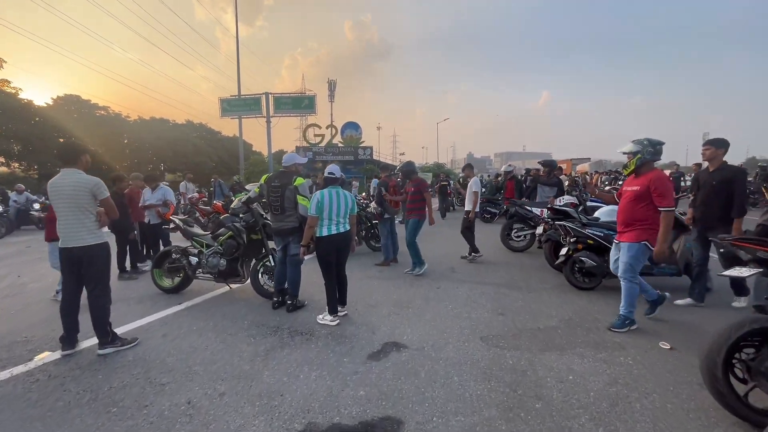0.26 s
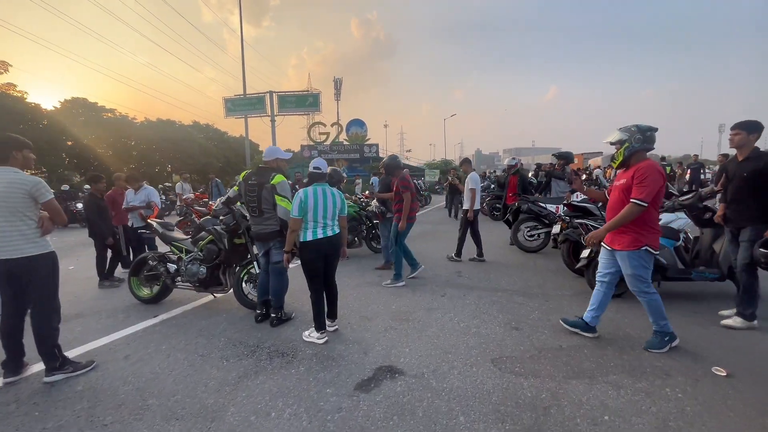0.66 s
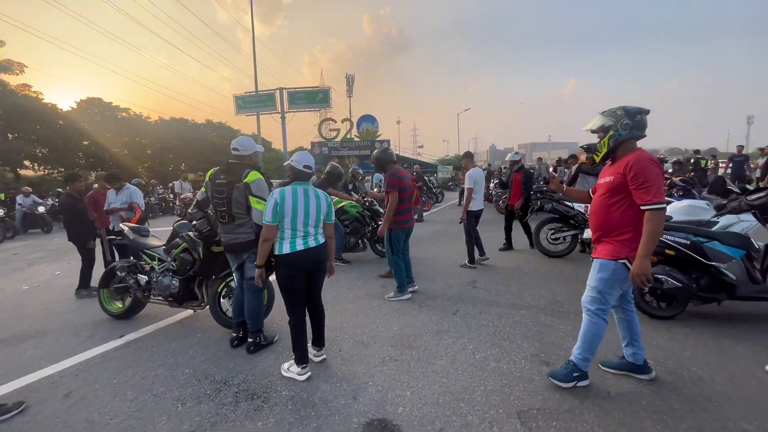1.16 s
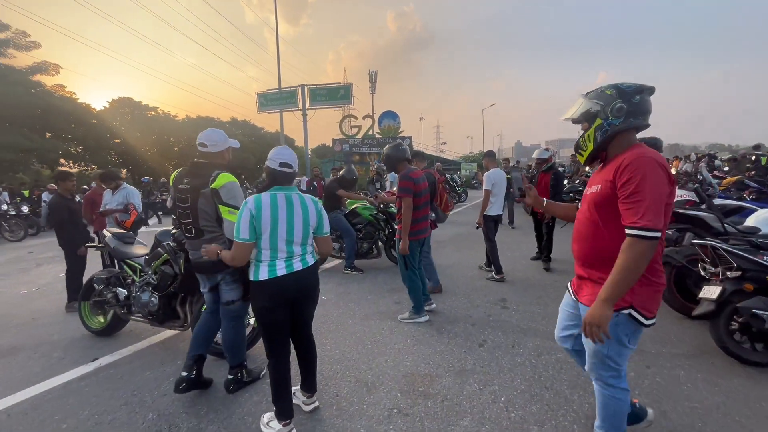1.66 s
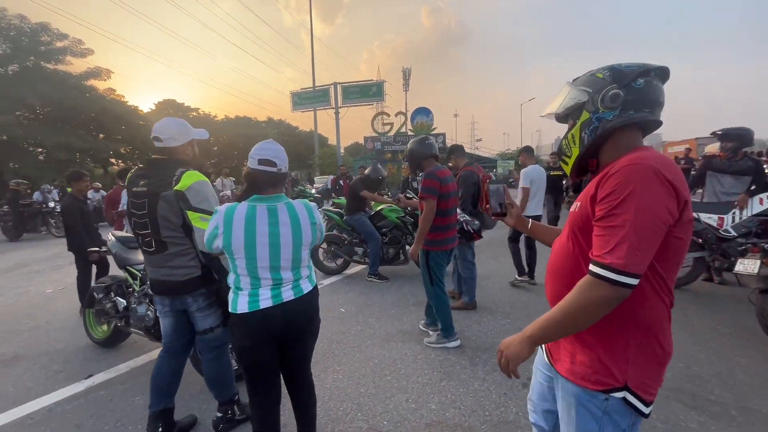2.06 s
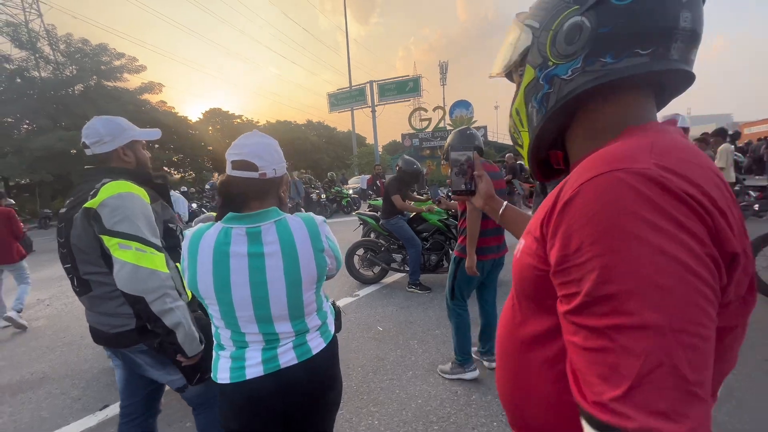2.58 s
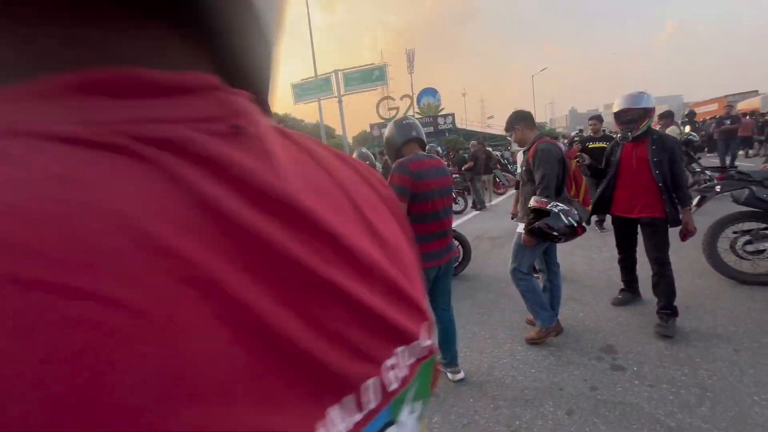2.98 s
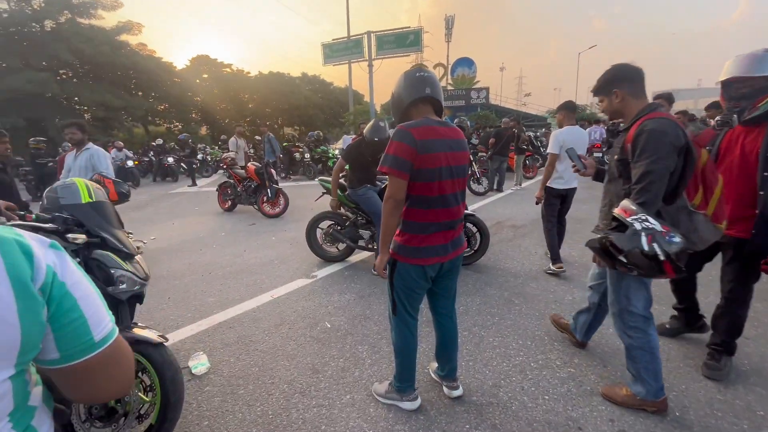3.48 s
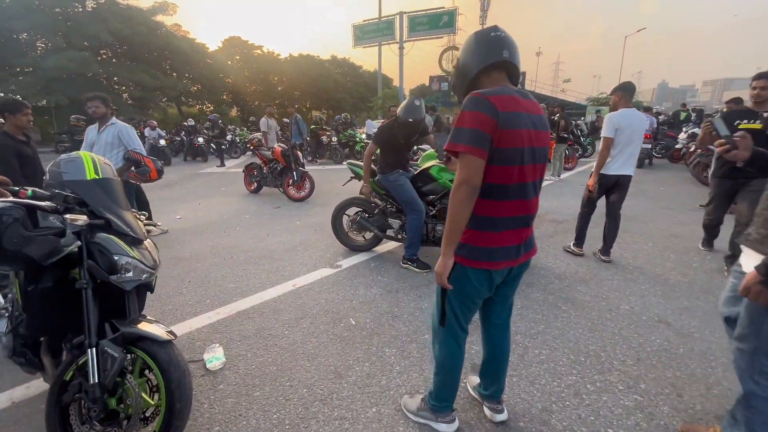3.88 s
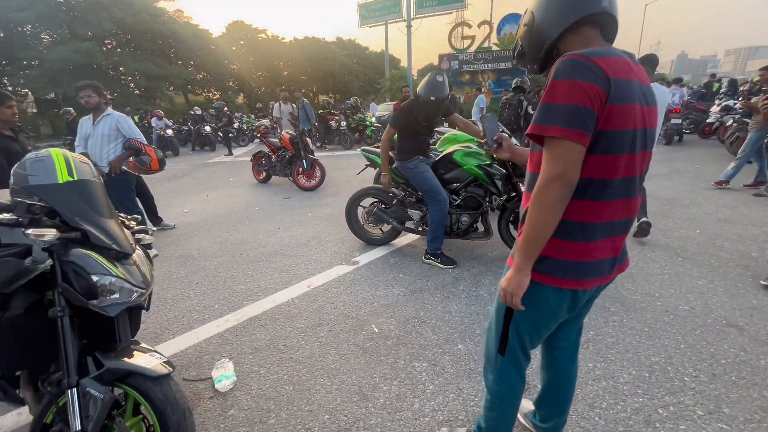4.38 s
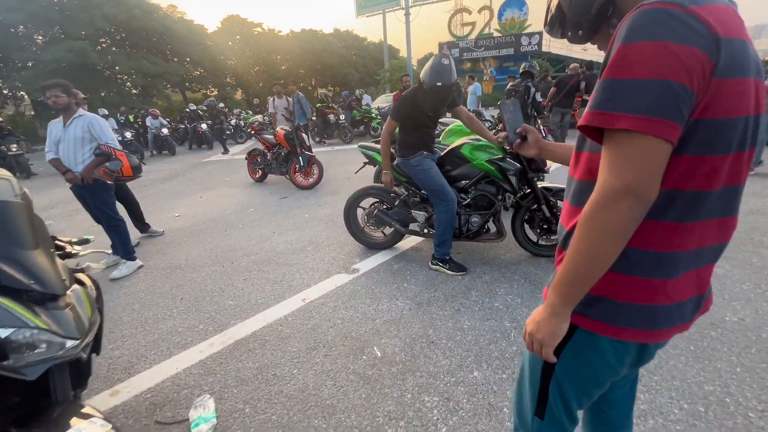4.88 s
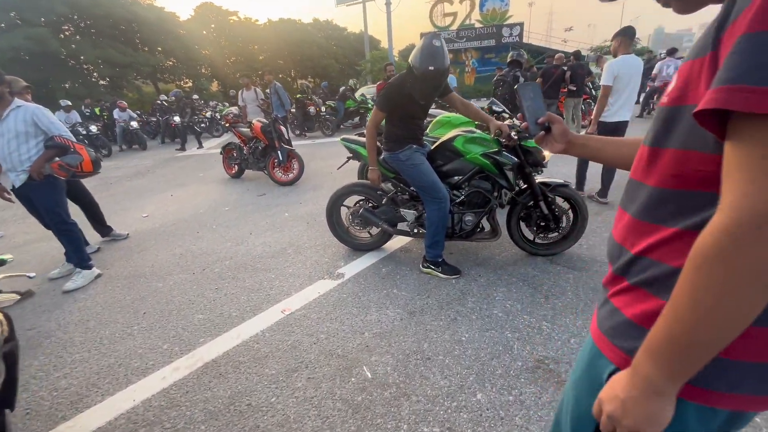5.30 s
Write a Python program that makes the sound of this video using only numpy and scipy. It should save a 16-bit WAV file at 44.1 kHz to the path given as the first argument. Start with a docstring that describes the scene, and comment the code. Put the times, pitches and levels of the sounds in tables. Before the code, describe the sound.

On an open street a sporty motorcycle engine falls from high revs, then is blipped four times, rasping, crackling and sinking back.

```python
"""A four-cylinder motorcycle engine at a standstill coasts down, then is blipped four times, on an open street.
Each blip climbs to the rev limiter, where the firings turn uneven and bark, then the revs coast down again.
One firing phase drives the low harmonics, the pressure fronts that ring the pipe into a rasp, and the hiss;
decaying sines that glide down pop around the limiter. Filtered noise lies throughout as a low background."""
import sys
import numpy as np
from scipy import signal
from scipy.fft import rfft, irfft, next_fast_len
from scipy.io import wavfile
from scipy.ndimage import uniform_filter1d

SR = 44100
rng = np.random.default_rng(int(sys.argv[2]) if len(sys.argv) > 2 else 0)


def wav_out(sig):
    """Save sig, one row per channel (or a flat mono array), as 16-bit PCM at SR to the path in sys.argv[1]."""
    wavfile.write(sys.argv[1], SR, np.round(np.clip(np.atleast_2d(sig).T, -1, 1) * 32767).astype(np.int16))


N = 244314
PADDED = next_fast_len(N + 4096)   # FFT length with room for filter tails

LIMIT_HZ = 366   # firings per second held by the rev limiter
COAST_HZ_PER_S, FUELLED_HZ_PER_S = 260, 200   # revs fall fast, then slower once the fuel returns
FUEL_BACK_HZ = 190   # firing rate at which the fuel returns

# spells on the rev limiter: (from [s], to [s])
LIMITER = [(0.933, 1.126), (2.135, 2.5), (3.854, 4.01), (4.905, 5.08)]


def engine():
    """Source superposition: tones, rasp and hiss share one firing phase, so they move together."""
    hz, db1, db2, db3, db4, rasp_db, hiss_db, pan_db = exhaust()
    bark_hiss, bark_rasp, spark = barks()
    t = np.arange(N) / SR
    cutting = uniform_filter1d(sum(1. * (t > a) * (t < b) for a, b in LIMITER), size=200)
    phase, strength, edge = firings(hz, cutting)
    lit = edge * (1 - 0.62 * cutting * (1 - spark))   # overtones sink between barks
    stumble = .8 * cutting * drift(60)   # radians the beat slips on the limiter
    low = low_tones(hz, phase, stumble, strength, lit, db1, db2, pan_db)
    upper = upper_tones(phase + stumble, lit, db3, db4)
    rasp = rasps(phase, stumble, edge, rasp_db, bark_rasp)
    hiss = hisses(phase, hiss_db, bark_hiss)
    common, *own = np.add(rasp, hiss)
    return low + ports(common + upper, np.array(own) + upper)


def firings(hz, cutting):
    """Phase is the integral of frequency; each firing draws its strength, most unevenly on the limiter."""
    # the four cylinders fire unequally: (level [dB])
    cylinder_db = [.3, -.5, .5, -.3]
    turns = np.cumsum(hz * (1 + .002 * drift(30))) / SR
    firing = np.floor(turns + .5).astype(int)
    chance = rng.standard_normal((3000, 2))[firing]
    cylinder = amp(np.array(cylinder_db)[firing % 4])
    strength = cylinder * (1 + (.02 + .55 * cutting) * chance[:, 0])
    edge = cylinder ** 4 * (1 + (.2 + .55 * cutting) * chance[:, 1])
    return 2 * np.pi * turns, uniform_filter1d(strength, size=200), uniform_filter1d(edge, size=40)


def low_tones(hz, phase, stumble, strength, lit, db1, db2, pan_db):
    """Fourier synthesis of the firing tone, its 2nd harmonic and the crank's fractional multiples."""
    # the uneven cylinders hum at fractions of the firing rate: (multiple of firing rate, level [dB])
    crank = [(.5, -49.5), (.75, -48.5), (1.251, -44), (1.5, -60), (1.749, -62.5)]
    heard = phase - 2 * np.pi * hz * np.array([[.0003], [0]])   # the left port hears it 0.3 ms later
    boom = strength * amp(db1) * np.cos(heard + stumble)
    # the silencer chokes the boom above its chamber resonance
    boom = signal.sosfilt(signal.cheby2(6, 30, 520, fs=SR, output="sos"), boom)
    second = lit * amp(db2 + 3.5 * drift(20)) * np.cos(2 * (heard + stumble) + 1)
    hum = sum(amp(db + 6.4 * drift(11)) * np.cos(multiple * heard) for multiple, db in crank)
    return (boom + second + hum) * np.sqrt(2) * amp([pan_db / 2, -pan_db / 2])


def upper_tones(beat, lit, db3, db4):
    """Comb filtering: reflections break up the gliding 3rd and 4th harmonics at unchanged spread."""
    third = amp(db3 + 3 * drift(16)) * np.cos(3 * beat + 2.2)
    fourth = amp(db4 + 3 * drift(16)) * np.cos(4 * beat + 1.1)
    upper = lit * 2 * (third + fourth)
    return np.std(upper) * echoes(upper, 1)


def rasps(phase, stumble, edge, rasp_db, bark_rasp):
    """Source-filter principle: sharp pressure fronts and torn flow excite the pipe resonances."""
    # overtones 5 to 24 slope off, each wavering in level and phase
    fronts = edge * sum(amp(4 * drift(9) - .7 * (k - 8)) * np.cos(k * (phase + stumble) + .8 * drift(12))
                        for k in range(5, 25))
    # torn gas flow rides each front
    gusts = 1.3 * edge * (1 + .5 * np.cos(phase)) * rng.standard_normal(N)
    rung = pipe(fronts + gusts)
    # a bark also rings the lower overtones
    barked = rung + pipe(0.7 * edge * sum(np.cos(k * phase) for k in (2, 3, 4)))
    # one common part and one for each port, told apart by their echo paths
    return [amp(rasp_db) * echoes(rung, stretch) + bark_rasp * echoes(barked, stretch)
            for stretch in (1, 1.23, .81)]


def hisses(phase, hiss_db, bark_hiss):
    """Amplitude-modulated turbulence: broadband flow noise swells a little with each firing."""
    # noise colour before scaling to unit rms: (frequency [Hz], relative level [dB])
    hiss_spectrum = [(450, -58), (700, -10), (1100, -10), (1600, -13), (2430, -13.5), (3850, -12),
                     (5000, -16.5), (5750, -21), (6400, -19.5), (7100, -25.5), (9200, -21.5),
                     (11500, -27.5), (13700, -29.5), (15600, -44)]
    puff = 1 + 0.15 * np.cos(phase - .6)
    return [(amp(hiss_db + 2 * drift(30)) + bark_hiss) * colour(puff * rng.standard_normal(N), hiss_spectrum)
            for _ in range(3)]


def exhaust():
    """Radiation by operating point: harmonic, rasp and hiss levels follow speed, drive and blip."""
    # exhaust by engine speed, with drive off and on: (firing rate [1/s],
    # basic levels of 1st, 2nd, 3rd, 4th harmonic [dB], of rasp [dB], of hiss [dB])
    coasting = [(100, -42, -32, -60, -65, -66, -80), (150, -28, -36, -68, -66, -60, -58),
                (170, -22, -35, -62, -58, -54, -53), (191, -19, -27, -45, -43, -35, -46),
                (213, -17, -36, -52, -50, -46, -52), (238, -19, -46, -48, -47, -44, -48),
                (272, -14.5, -45, -43, -36, -34, -42), (305, -17, -44, -45, -42, -33, -37),
                (335, -20, -42, -42, -49, -37, -36), (366, -20, -34, -40, -43, -38, -35)]
    climbing = [(100, -40, -30, -52, -58, -50, -65), (145, -30, -28, -50, -52, -43, -55),
                (195, -24, -25, -50, -41, -35, -47), (240, -13, -38, -37, -35, -25, -34),
                (290, -17, -32, -37, -35, -23, -29), (366, -16, -30, -32, -36, -22, -24)]
    # lean of the low tones, rightward: (firing rate [1/s], left minus right [dB])
    lean = [(100, -1.5), (200, -1), (270, -2.5), (330, -6), (366, -8)]
    # brief dips and swells: (time [s], change of 1st, 2nd, 3rd, 4th harmonic [dB], of rasp [dB], width [s])
    dips = [(.24, -6, -4, 0, 0, 0, .02), (.45, 0, 0, 8, 0, 0, .04), (.67, -5, 0, 0, 0, 0, .03),
            (1.24, -4, 0, -4, -8, 0, .04), (1.35, 0, 0, -4, 4, 0, .04), (1.5, 0, 0, 9, -5, 0, .04),
            (1.62, -3, -8, 0, 0, 0, .03), (2.525, -15, 6, 0, 0, -3, .035), (2.65, -2, 0, -12, 8, 6, .07),
            (3.08, -3, -3, 5, -3, 0, .05), (4.1, -3, -8, 3, -4, 0, .06), (4.4, 0, -6, -10, -3, -3, .05),
            (4.7, -4, 0, -6, 0, -4, .03), (4.83, 0, 5, 4, 0, 0, .04), (5.1, 0, 0, -7, -6, -4, .06),
            (5.45, -3, 0, -6, 0, 0, .04)]
    full_from_hz = 280   # a blip's own boom level takes hold from here up to the limit
    chamber_hz, chamber_width_hz = 390, 50   # silencer chamber that the 2nd harmonic sweeps through
    roar_s = .11   # decay time of the roar on opening
    hz, drive, since, (boom_db, chamber_db, roar_db, *upper_db) = revs()
    db = drive * by_speed(climbing, hz) + (1 - drive) * by_speed(coasting, hz)
    overtones_db, rasp_db, hiss_db = drive * upper_db[:3] + (1 - drive) * upper_db[3:]
    # rows of db: harmonics 1 to 4, rasp, hiss
    db[0] += drive * boom_db * np.clip((hz - full_from_hz) / (LIMIT_HZ - full_from_hz), 0, 1)
    db[1] += chamber_db * np.exp(-((2 * hz - chamber_hz) / chamber_width_hz) ** 2)
    db[1] += (1 - drive) * overtones_db
    db[2:4] += overtones_db
    db[4:] += [rasp_db, hiss_db]
    db[[1, 4, 5]] += drive * roar_db * np.exp(-since / roar_s)
    t = np.arange(N) / SR
    for s, *change_db, width in dips:
        db[:5] += np.c_[change_db] * np.exp(-((t - s) / width) ** 2)
    return hz, *db, by_speed(lean, hz)[0]


def revs():
    """Piecewise-linear kinematics: speed, drive 0-1, time since opening, levels of the blip."""
    # throttle blips: (opens [s], climb [firings/s per s], revs start to fall [s],
    # boom at full revs [dB], chamber ring [dB], roar on opening [dB],
    # overtones, rasp, hiss with drive on [dB], overtones, rasp, hiss with drive off [dB])
    blips = [(-.8, 950, -.232, 0, 10, 0, 0, 0, 0, -1, -2, 1),
             (.682, 945, 1.12, 7, 7, 0, -2, -2, -1, -3, -1, 2),
             (1.919, 1020, 2.405, -2, 0, 6, 0, -3, -1, -2, 1, -1),
             (3.566, 1015, 3.9, -1, -6, 15, 3, 3, 1, 6, 7, 4),
             (4.663, 800, 4.992, 3, -7, -4, 7, 0, 5, 7, 5, 5)]
    follow_s = .02   # time for the exhaust to follow a change of speed or drive
    t = np.arange(N) / SR
    opens, climb, falls, *levels = np.transpose(blips)
    blip = np.searchsorted(opens, t) - 1
    start = np.append(LIMIT_HZ, coast(opens[1:] - falls[:-1]))   # each climb starts where the coast ended
    hz = np.minimum(start[blip] + climb[blip] * (t - opens[blip]), coast(t - falls[blip]))
    cut = np.append(opens[0], np.transpose(LIMITER)[0])   # full drive ends as the limiter cuts in

    def smooth(x):
        """Moving average: the exhaust follows with inertia."""
        return uniform_filter1d(x, size=int(follow_s * SR))

    return smooth(hz), smooth(1. * (t < cut[blip])), t - opens[blip], np.array([smooth(c[blip]) for c in levels])


def coast(since):
    """Uniform deceleration in two stages, from the limit, by seconds since the fall began."""
    fuel_back = (LIMIT_HZ - FUEL_BACK_HZ) / COAST_HZ_PER_S
    unfuelled_drop = COAST_HZ_PER_S * np.clip(since, 0, fuel_back)
    return LIMIT_HZ - unfuelled_drop - FUELLED_HZ_PER_S * np.maximum(since - fuel_back, 0)


def by_speed(rows, hz):
    """Linear interpolation of a table's columns over engine speed."""
    speed, *columns = np.transpose(rows)
    return np.array([np.interp(hz, speed, c) for c in columns])


def barks():
    """Transient envelopes of hiss, rasp and spark: fast rise, plateau, exponential fall."""
    # barks as the ignition returns:
    # (time [s], hiss level before a common 15.5 dB cut [dB], rasp level [dB], time to the fall [s])
    bark_rows = [(0.9823, -8, -25, 0.012), (1.0444, -11.5, -25, 0.023), (1.106, -13.5, -29.5, 0.021),
                 (2.1674, -5.5, -33, 0.018), (2.2314, -4, -21.5, 0.016), (2.3013, -4.5, -15, 0.013),
                 (2.3607, -2, -47, 0.014), (2.4238, -11, -27, 0.0074), (3.8896, -6, -23.5, 0.014),
                 (3.962, -11.5, -23.5, 0.017), (4.9413, -4.5, -22.5, 0.019), (4.9975, -14, -23, 0.036)]
    t, hiss, rasp, spark = np.arange(N) / SR, np.zeros(N), np.zeros(N), np.zeros(N)
    for s, hiss_db, rasp_db, length in bark_rows:
        age = np.maximum(t - s, 0)
        gate = np.minimum(age / 0.006, 1) * np.exp(-np.maximum(age - length, 0) / 0.008)
        hiss += amp(hiss_db - 15.5) * gate
        rasp += amp(rasp_db) * gate
        spark += gate
    return hiss, rasp, spark


def pipe(x):
    """Modal superposition: two-pole resonances in parallel, signs alternating."""
    # pipe resonances: (frequency [Hz], bandwidth [Hz], gain [dB])
    modes = [(756, 270, 5.5), (1106, 196, 9.5), (1538, 162, 8.5), (1743, 188, 11), (2620, 190, 6),
             (3080, 340, 1), (3320, 490, 3), (3840, 200, 3), (4095, 620, -4)]
    out = 0
    for k, (hz, width_hz, db) in enumerate(modes):
        r = np.exp(-np.pi * width_hz / SR)   # pole radius
        poles = [1, -2 * r * np.cos(2 * np.pi * hz / SR), r * r]
        out = out + (-1) ** k * amp(db) * signal.lfilter([1 - r * r, 0, r * r - 1], poles, x)
    return out


def echoes(x, stretch):
    """Specular reflection: delayed copies, path lengths scaled by stretch; sum at unit rms."""
    # off road and parked machines: (delay at stretch 1 [s], level [dB])
    reflections = [(.0043, -6), (.0117, -8), (.023, -10), (.047, -12)]
    out = x.copy()
    for s, db in reflections:
        lag = int(s * stretch * SR)
        out[lag:] += amp(db) * x[:-lag]
    return rms_one(out)


def pops():
    """Damped oscillation: short low thumps whose frequency relaxes downward."""
    # unburnt gas pops in the silencer: (time [s], level before decay [dB], upper pitch setting [Hz],
    # final pitch [Hz], decay [s], left minus right [dB]); the onset lies about 1.5 times the
    # difference of the two pitches above the final one
    pop_rows = [(1.022, -24, 263, 168, 0.011, 2), (1.124, -13, 247, 194, 0.013, -2),
                (2.17, -6.5, 251, 186, 0.0082, 0), (2.37, -11, 258, 44.5, 0.018, 8.5),
                (3.868, -19, 263, 171, 0.0079, 0), (3.903, -13, 264, 139, 0.0086, -2),
                (3.964, -13.5, 275, 153, 0.009, -3), (4.9, -22, 238, 86, 0.019, 3),
                (5.008, -8, 292, 151, 0.006, -3)]
    out = np.zeros((2, N))
    for s, db, upper_hz, last_hz, decay, pan_db in pop_rows:
        age = np.maximum(np.arange(N) / SR - s, 0)
        turns = last_hz * age + (upper_hz - last_hz) * .012 * (1 - np.exp(-age / 0.0079))
        gain = amp([[db + pan_db / 2], [db - pan_db / 2]])
        out += gain * np.sin(2 * np.pi * turns) * np.exp(-age / decay)
    return out


def background():
    """Spectral shaping of random noise: a lumpy low rumble, strongest near 170-260 Hz, with a faint top."""
    # steady background noise before scaling to unit rms: (frequency [Hz], relative level [dB])
    rumble_spectrum = [(25, -36.5), (45, -10), (75, -9), (120, -19), (170, -5), (260, -3.5), (400, -26),
                       (530, -62), (700, -28), (900, -19.5), (1310, -35), (2400, -39), (4150, -42.5),
                       (12800, -60), (15000, -94)]
    common, *own = [amp(-36.5 + 2 * drift(6)) * colour(rng.standard_normal(N), rumble_spectrum)
                    for _ in range(3)]
    return ports(common, np.array(own))


def ports(common, own):
    """Partial coherence: one part reaches both microphone ports with a phase lead, the rest differs."""
    # phase between the ports: (frequency [Hz], lead of the left [rad])
    lead = [(20, -.1), (350, -.5), (600, 1.9), (1000, 1.5), (1400, 1.9), (1900, 4.8), (2400, 7.2),
            (3270, 8.5), (4310, 12.9), (6370, 17.8), (9300, 26.7), (10600, 8 * np.pi), (20000, 8 * np.pi)]
    # power common to both ports: (frequency [Hz], share [0-1])
    shared = [(30, 1), (400, 0.82), (550, 1), (1000, 0.73), (2000, 0.83), (4000, 0.31), (9000, 0.23),
              (10000, 0.23), (11000, 1), (16000, 0.3)]
    # balance of the ports: (frequency [Hz], left minus right [dB])
    balance = [(60, -4), (110, 8.5), (200, 0.5), (380, -31.5), (700, 2.5), (1290, -0.5), (2380, -4.5),
               (4400, 0.5), (8120, -5.5), (15000, 1.5)]
    share = np.clip(at_hz(shared), 0, 1)
    turn = np.exp(.5j * at_hz(lead))
    tilt = amp(at_hz(balance) / 2)
    side = np.sqrt(1 - share) * rfft(own, PADDED)
    both = np.sqrt(share) * rfft(common, PADDED)
    return irfft([(both * turn + side[0]) * tilt, (both / turn + side[1]) / tilt], PADDED)[:, :N]


def colour(x, spectrum):
    """Linear filtering in the frequency domain by gains in dB, then unit rms."""
    return rms_one(irfft(rfft(x, PADDED) * amp(at_hz(spectrum)), PADDED)[:N])


def at_hz(points):
    """Logarithmic frequency scale: a table interpolated to one value per FFT bin."""
    hz, value = np.transpose(points)
    return np.interp(np.log(np.arange(PADDED // 2 + 1) * SR / PADDED + 1), np.log(hz + 1), value)


def drift(rate):
    """Slow random modulation: unit-spread points, rate per second, joined by straight lines."""
    points = rng.standard_normal(400)
    return np.interp(np.arange(N) / SR * rate, np.arange(len(points)), points)


def amp(db):
    """Decibel law: amplitude gain of a level in dB."""
    return 10 ** (np.asarray(db) / 20)


def rms_one(x):
    """Energy normalisation: scaled to unit rms."""
    return x / np.sqrt(np.mean(x ** 2) + 1e-20)


def scene():
    """Linear superposition of engine, pops and background noise."""
    return engine() + pops() + background()


def record(dry):
    """Band limitation: the microphone drops the deepest bass, and the top is cut."""
    dry = signal.sosfilt(signal.butter(2, 40, "high", fs=SR, output="sos"), dry)
    # 70 dB down from 15665 Hz
    return signal.sosfilt(signal.cheby2(12, 70, 15665, fs=SR, output="sos"), dry)


dry = scene()
out = record(dry)
wav_out(out)
```